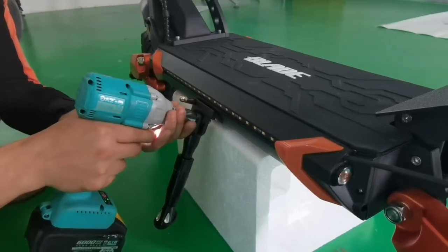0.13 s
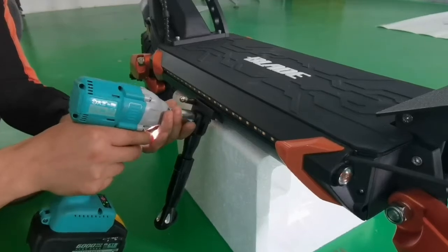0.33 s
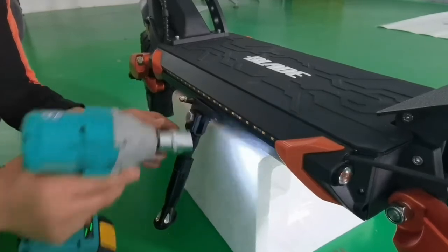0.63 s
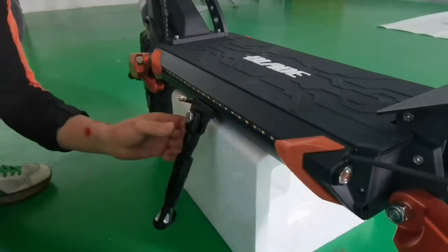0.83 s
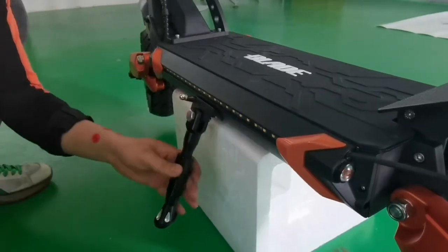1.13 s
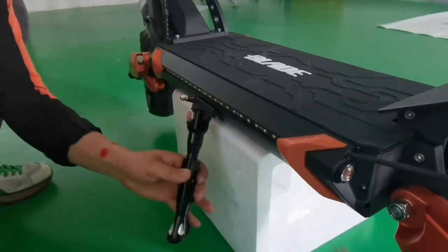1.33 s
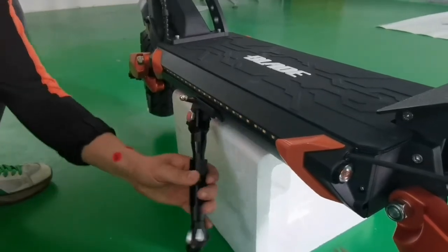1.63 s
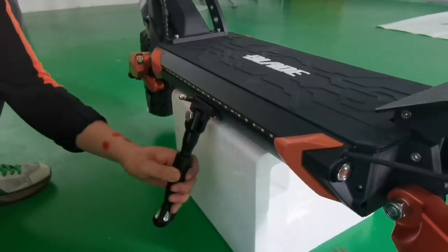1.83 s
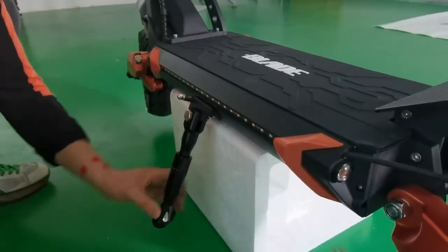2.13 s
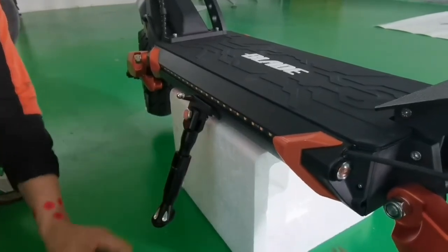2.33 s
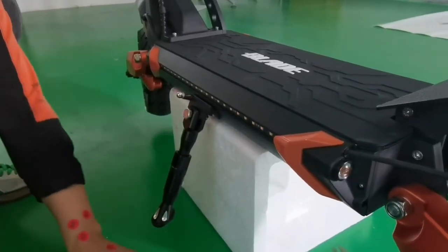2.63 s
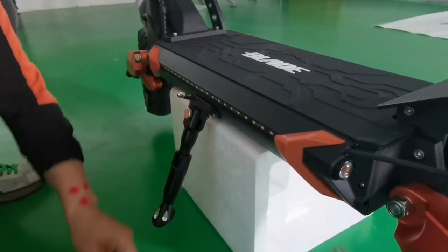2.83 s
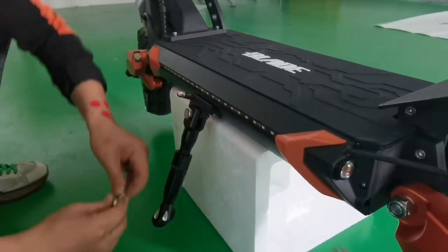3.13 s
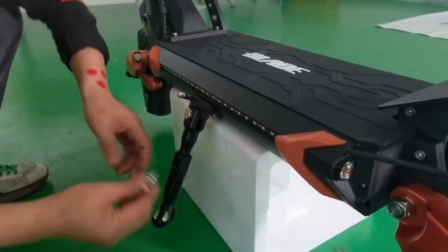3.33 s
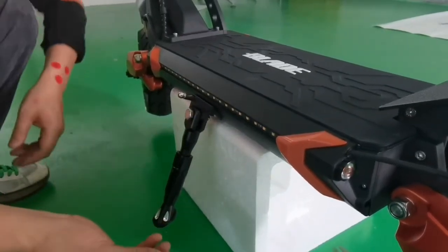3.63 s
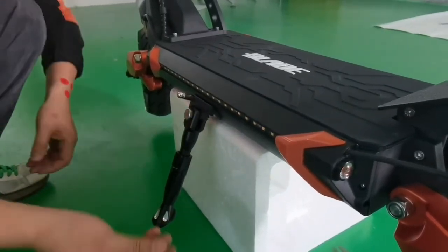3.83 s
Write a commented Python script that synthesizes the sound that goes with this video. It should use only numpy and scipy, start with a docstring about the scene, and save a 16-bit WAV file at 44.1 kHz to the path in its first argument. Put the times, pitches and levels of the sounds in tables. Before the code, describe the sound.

Impact driver close to the microphone: brief motor wind-down, short pause, harsh hammering on a bolt, echoing tail. Then quiet kickstand clicks, a sharper snap with frame shudder, sleeve rustle and a distant scrape over low workshop rumble.

```python
"""A motor blip winds down, then a cordless impact driver restarts and hammers a bolt home on a kickstand.
Seven blows grind and ring the steel socket: shaped grit drives filters and damped modes.
A hand swings the stand out with two clicks and lets it snap back: short grit bursts, then a frame shudder.
A large hard-floored workshop answers with decaying noise; under it a rumble, hum, faint drones,
a rustling sleeve and a far scrape, all from filtered noise or wavering tones."""
import sys
import numpy as np
from scipy import signal
from scipy.fft import rfft, irfft
from scipy.io import wavfile
from scipy.ndimage import uniform_filter1d

SR = 44100
rng = np.random.default_rng(int(sys.argv[2]) if len(sys.argv) > 2 else 0)


def materialize(psi):
    """Save the field psi as 16-bit PCM at rate SR to the path in sys.argv[1].

    A 1-D psi becomes a single channel; in a 2-D psi each row is a channel.
    """
    bounded = np.clip(np.atleast_2d(psi).T, -1, 1)
    quanta = np.round(bounded * 32767).astype(np.int16)
    wavfile.write(sys.argv[1], SR, quanta)


N = 176400
LEAD_S = .25  # computed ahead of time 0, dropped in scene()
T = np.arange(-int(LEAD_S * SR), N) / SR
M = len(T)


def undb(db):
    """Decibels to gain."""
    return 10 ** (np.asarray(db) / 20)


def unit(x):
    """Scale to rms 1."""
    return x / np.sqrt(np.mean(x ** 2) + 1e-30)


def curve(rows, axis=1):
    """One column of a table, joined by straight lines in time."""
    rows = np.array(rows)
    return np.interp(T, rows[:, 0], rows[:, axis])


def colour(x, points):
    """Causal minimum-phase filter of unit power through (frequency [Hz], level [dB]) points."""
    size = 8192
    hz, db = np.array(points).T
    log_f = np.log(np.fft.rfftfreq(size, 1 / SR) + 1)
    gain = unit(undb(np.interp(log_f, np.log(hz), db)))
    cepstrum = irfft(np.log(gain))
    cepstrum[1:size // 2] *= 2  # fold onto positive time
    cepstrum[size // 2 + 1:] = 0
    impulse = irfft(np.exp(rfft(cepstrum)))
    return signal.fftconvolve(x, impulse)[:len(x)]


def band(x, hz, width_hz, order=1):
    """Band-pass around a centre."""
    edges = np.clip([hz - width_hz / 2, hz + width_hz / 2], 10, SR / 2 - 100)
    return signal.sosfilt(signal.butter(order, edges, "band", fs=SR, output="sos"), x)


def noise():
    """White noise."""
    return rng.standard_normal(M)


def walk(rate_hz):
    """Smoothed random steps of rms 1."""
    hold = int(SR / rate_hz)
    steps = np.repeat(rng.standard_normal(M // hold + 1), hold)
    return unit(uniform_filter1d(steps, hold)[:M])


def grit(grain_db):
    """Dense tiny contacts of uneven size."""
    return unit(np.tanh(noise()) * undb(grain_db * np.tanh(walk(1500))))


def contact(at, rise, fall):
    """Force of a contact: exponential build-up and decay."""
    return np.exp(-np.minimum(np.where(T < at, (at - T) / rise, (T - at) / fall), 60))


def bump(at, rise, fall):
    """Force of a firm contact: Gaussian flanks."""
    return np.exp(-np.minimum(((T - at) / np.where(T < at, rise, fall)) ** 2, 60))


def ping(at, rise, fall, hz):
    """A few cycles of a well-damped resonance."""
    return bump(at, rise, fall) * np.sin(2 * np.pi * hz * (T - at))


def ring(x, modes):
    """Damped modes driven by x; their joint impulse response has unit power."""
    t = np.arange(SR // 2) / SR
    impulse = 0
    for hz, db, t60 in modes:
        decay = np.exp(-np.log(1000) * t / t60)
        impulse = impulse + undb(db) / np.sqrt(t60) * np.sin(2 * np.pi * hz * t) * decay
    return signal.fftconvolve(x, impulse / np.linalg.norm(impulse))[:M]


def resonances(rows):
    """Noise held in a few resonances."""
    return sum(undb(db) * unit(band(noise(), hz, width, order=2)) for hz, width, db in rows)


# hall air: (frequency [Hz], level [dB])
HALL_COLOUR = [(15, -48), (28, -27), (50, -11), (80, -5), (110, -6.5), (150, 0), (200, -6.5), (420, -8),
               (600, -14), (730, -12.5), (1500, -20), (2800, -25.5), (4100, -20.5), (5200, -30.5),
               (7400, -33.5), (8800, -54), (11600, -45.5), (14000, -53)]
# hall air: (time [s], level [dB])
HALL_LEVEL = [(0, -63.5), (2.4, -65), (3.1, -67), (3.27, -64), (3.6, -66.5), (4, -66)]


def hall_air():
    """Broadband hall rumble: coloured noise, slightly unsteady."""
    return undb(curve(HALL_LEVEL) + 0.51 * walk(16)) * colour(noise(), HALL_COLOUR)


# bass: (time [s], level [dB])
BASS_LEVEL = [(0, -80), (0.8, -82.5), (0.9, -73), (1.05, -80.5), (3.1, -71), (3.25, -62), (3.45, -66),
              (3.58, -73.5), (3.8, -66), (4, -66)]


def bass_rumble():
    """Bass noise around 72 Hz that swells and sinks."""
    return undb(curve(BASS_LEVEL)) * unit(band(noise(), 72, 62, order=2))


# machinery: (frequency [Hz], level [dB])
HUM_BANDS = [(55, -78.5), (150, -70.5), (424, -83)]


def machine_hum():
    """Machinery hum: noise in 12 Hz wide bands."""
    return sum(undb(db) * unit(band(noise(), hz, 12, order=2)) for hz, db in HUM_BANDS)


OCTAVE_DB = -17


def swell(at, length, hz, db, waver):
    """A wavering tone with a faint octave; it rises and fades."""
    progress = np.clip((T - at) / length, 0, 1)
    shape = np.sqrt(np.maximum(np.sin(np.pi * progress), 0))
    phase = 2 * np.pi * np.cumsum(hz * (1 + waver * walk(160))) / SR
    tone = unit(np.sin(phase) + undb(OCTAVE_DB) * np.sin(2 * phase))
    return undb(db) * shape * tone * undb(2 * walk(60))


# low drone swells: (time [s], length [s], frequency [Hz], level [dB])
DRONE_SWELLS = [(0.808, 0.065, 160, -56), (0.983, 0.044, 174, -58), (1.039, 0.085, 175, -55.5),
                (1.124, 0.063, 170, -56), (1.303, 0.048, 152, -53.5), (1.355, 0.13, 154, -59.5)]
# one thin tone: (time [s], length [s], frequency [Hz], level [dB])
THIN_TONE = (0.93, 0.6, 750, -66.5)
DRONE_WAVER, THIN_WAVER = .045, .02  # rms, fraction of pitch


def drones():
    """Short low swells and one longer thin tone, all with random pitch waver."""
    low = sum(swell(*row, waver=DRONE_WAVER) for row in DRONE_SWELLS)
    return low + swell(*THIN_TONE, waver=THIN_WAVER)


# sleeve: (time [s], level [dB])
RUSTLE_LEVEL = [(1.2, -95.5), (1.42, -67.5), (1.6, -86), (2.8, -89), (2.95, -73.5), (3.2, -77), (3.35, -75),
                (3.65, -94), (3.85, -77.5), (4.0, -72)]
# sleeve: (frequency [Hz], level [dB])
RUSTLE_COLOUR = [(300, 3), (1500, -2), (4000, 1.5), (7000, -2.5), (9000, -13.5), (14000, -11)]


def sleeve():
    """Cloth rustle: coloured grit under a fluttering level."""
    return undb(curve(RUSTLE_LEVEL) + 1.6 * walk(26)) * colour(grit(grain_db=2.5), RUSTLE_COLOUR)


# far scrape: (time [s], level [dB])
SCRAPE_LEVEL = [(3.66, -88.5), (3.76, -62.5), (3.88, -61), (4.0, -59.5)]
# far scrape: (frequency [Hz], width [Hz], level [dB])
SCRAPE_BANDS = [(655, 39, -2), (700, 160, -7.5), (1180, 250, -19), (1830, 390, -16.5)]


def far_scrape():
    """Something scrapes far off: noise in a few resonances."""
    return undb(curve(SCRAPE_LEVEL)) * resonances(SCRAPE_BANDS)


def workshop():
    """Sum of the background layers."""
    return hall_air() + bass_rumble() + machine_hum() + drones() + sleeve() + far_scrape()


# reverberation: (frequency [Hz], level [dB], t60 [s])
ROOM_BANDS = [(100, -18, 1.0), (445.8, -4.5, 1.5), (950, -11, 1.9), (2171, -7.8, 1.6), (3900, -10.3, 1.2),
              (6800, -6.5, .95), (11930, -8, 0.52)]
EARLY_DB, EARLY_T60_S, FIRST_ECHO_S = -8.5, .25, .008
ECHO_GRAIN_DB = 2.5  # unevenness of the tail


def room(x):
    """Quick echoes off floor and deck, then the hall's long tail, whose treble dies first."""
    size = 2 * SR
    t = np.arange(size) / SR
    log_f = np.log(np.fft.rfftfreq(size, 1 / SR) + 1)

    def decay(t60):
        """Exponential decay of unit energy."""
        return np.exp(-np.log(1000) * t / t60) * np.sqrt(2 * np.log(1000) / (t60 * SR))

    wash = rfft(unit(rng.standard_normal(size) * undb(ECHO_GRAIN_DB * walk(250)[:size])))
    centres = np.log([row[0] for row in ROOM_BANDS])
    impulse = undb(EARLY_DB) * decay(EARLY_T60_S) * rng.standard_normal(size)
    for (_, db, t60), share in zip(ROOM_BANDS, np.eye(len(ROOM_BANDS))):
        band_wash = irfft(wash * np.interp(log_f, centres, share))  # triangular crossfades
        impulse = impulse + undb(db) * decay(t60) * band_wash
    return x + signal.fftconvolve(x, impulse * (t > FIRST_ECHO_S))[:M]


# housing groans: (time [s], fall [s], frequency [Hz], level [dB])
GROAN_EVENTS = [(.381, .012, 610, -33), (.397, .01, 480, -35), (.446, .035, 460, -43)]


def housing_groans():
    """The braking motor groans through the housing: short bursts of narrow-band noise."""
    out = 0
    for at, fall, hz, db in GROAN_EVENTS:
        out = out + undb(db) * bump(at, .006, fall) * unit(band(noise(), hz, 140, order=2))
    return out


# frame: (frequency [Hz], width [Hz], level [dB])
FRAME_BANDS = [(467, 200, -5.5), (800, 250, -2.5), (1220, 170, -3.5)]
SHUDDER_S, SHUDDER_DB, SHUDDER_RISE_S, SHUDDER_FALL_S = 1.858, -55.5, .0093, .12


def frame_shudder():
    """The frame shakes after the stand snaps back: resonant noise with a decaying, uneven level."""
    force = contact(SHUDDER_S, SHUDDER_RISE_S, SHUDDER_FALL_S)
    return undb(SHUDDER_DB) * force * resonances(FRAME_BANDS) * undb(2 * walk(90))


# stand clicks: (time [s], level [dB], rise [s], fall [s], knock [dB], ring [dB], tick [dB])
STAND_CLICKS = [(1.2971, -52.5, 0.0025, 0.0038, 3, -5, -2.5), (1.3626, -51, 0.0015, 0.0028, 2, -20, -6.5),
                (1.8415, -43, 0.0006, .0048, -11, 8.5, -27), (1.869, -50, 0.0061, 0.0086, 0, -3, -11.5)]
# stand modes: (frequency [Hz], level [dB], t60 [s])
STAND_MODES = [(640, -3, .06), (780, -3, .05), (900, -10, .04), (1260, -12, .02), (2300, -9, .012),
               (3450, -2, .008), (4000, -1, .008), (4300, 0, .008), (4850, -1, .004)]
# frame knock: (frequency [Hz], level [dB])
KNOCK_COLOUR = [(100, -24), (350, -5), (750, -5), (1500, -3.5), (2800, -6), (4200, -9.5), (8000, -14.5),
                (14000, -40)]
# bright tick: (frequency [Hz], level [dB])
TICK_COLOUR = [(500, -12), (2000, -2), (4000, 1.5), (7000, -9), (12000, 4), (15000, -29)]
STEEL_TOP_HZ = 5800


def stand():
    """The leg meets its stops: a dull knock in the frame, a steel ring and a bright tick."""
    low_pass = signal.butter(6, STEEL_TOP_HZ, fs=SR, output="sos")
    out = 0
    for at, db, rise, fall, knock_db, ring_db, tick_db in STAND_CLICKS:
        force = undb(db) * bump(at, rise, fall)
        knock, steel, tick = (force * grit(grain_db=4) for _ in range(3))
        steel = signal.sosfilt(low_pass, steel)
        out = out + undb(knock_db) * colour(knock, KNOCK_COLOUR)
        out = out + undb(ring_db) * ring(steel, STAND_MODES)
        out = out + undb(tick_db) * colour(tick, TICK_COLOUR)
    return out


# motor effort: (time [s], level [dB])
MOTOR_EFFORT = [(-0.12, 0.5), (-0.02, 2.5), (0.008, -8), (0.04, -21), (0.15, -21), (0.188, -32),
                (0.203, -1.5), (0.25, -6.5), (0.3, -0.5), (0.385, -3.5), (0.41, -4.5), (0.48, -11.5),
                (0.56, -49)]
# gear mesh: (time [s], pitch [Hz], whine level [dB])
GEAR_WHINE = [(0, 1150, -47), (0.028, 1090, -35), (0.042, 1070, -50.5), (0.06, 1050, -60), (0.17, 800, -72),
              (0.21, 950, -56), (0.36, 900, -55), (0.39, 520, -49), (0.47, 420, -74.5), (0.56, 300, -94)]
# gear rattle: (frequency [Hz], level [dB])
GEAR_COLOUR = [(88, -58), (150, -31), (426, -8), (600, -3.5), (860, -4.5), (1080, -1), (1550, -6),
               (4230, -2), (7070, -11.5), (11600, -13), (14000, -18.5)]
GEAR_DB, GEAR_GRAIN_DB, OVERTONE_DB = -30, 0.5, -11.5


def motor():
    """Gears rattle with the effort and whine at a pitch that falls as the motor brakes."""
    rattle = undb(GEAR_DB + curve(MOTOR_EFFORT)) * colour(grit(GEAR_GRAIN_DB), GEAR_COLOUR)
    phase = 2 * np.pi * np.cumsum(curve(GEAR_WHINE) * (1 + .025 * walk(300))) / SR
    whine = unit(np.sin(phase) + undb(OVERTONE_DB) * np.sin(4 * phase))
    running = T < MOTOR_EFFORT[-1][0]
    return (rattle + undb(curve(GEAR_WHINE, axis=2)) * whine) * running


# blows: (time [s], level [dB], steel ring [dB], treble [dB], body knock [Hz], knock [dB],
#         deck thump [Hz], thump [dB])
HAMMER_BLOWS = [(0.2050, -5.5, -4, -2, 870, -33, 200, -60), (0.2397, -2.5, 0, 1.5, 820, -40, 100, -50),
                (0.2685, .5, -4, 3, 920, -29, 45, -40), (0.2928, 1.5, -2, 1, 900, -24, 240, -41),
                (0.3168, -.5, 0, -1, 1040, -30, 150, -34.5), (0.3418, 0, -2, 0, 1350, -36, 85, -38.5),
                (0.3668, 0, 3, -4, 920, -29, 250, -54)]
# grinding: (frequency [Hz], level [dB])
BLOW_COLOUR = [(120, -46.5), (200, -21.5), (340, -13.5), (420, -23.5), (571, -15), (890, -2.5), (1270, -7),
               (1400, -12.5), (1900, -13.5), (2240, 0), (2500, -8), (4330, 1.5), (7250, -3.5), (11700, -3),
               (14000, -4)]
# socket, anvil and bolt modes: (frequency [Hz], level [dB], t60 [s])
SOCKET_MODES = [(587, -6, .2), (830, -6, .04), (915, -7, .05), (2290, -3, .03), (3030, -8, .15),
                (3275, -3, .08), (4210, -1, .05), (4290, -2, .05), (4457, -1, .08), (5190, -6, .04),
                (6820, -6, .03), (11600, -4, .008)]
BLOW_RISE_S, BLOW_FALL_S, BLOW_DB, SOCKET_DB = 0.0043, 0.0031, -15, -25.5
SKIRT_DB, SKIRT_S = -5, 0.0034  # looser grinding before and after a blow
KNOCK_RISE_S, KNOCK_FALL_S, THUMP_FALL_S = .003, .006, .008
TREBLE_HZ = 7500  # high-pass corner
CHATTER_DB, CHATTER_HZ, CHATTER_WIDTH_HZ = -34, 11550, 4000


def hammer():
    """Blows grind the socket on the bolt, ring steel, knock the frame, thump the deck; the socket chatters."""
    rough = grit(grain_db=2.5)
    high_pass = signal.butter(2, TREBLE_HZ, "high", fs=SR, output="sos")
    treble = signal.sosfiltfilt(high_pass, rough)
    grind = strike = body = 0
    for at, db, ring_db, treble_db, knock_hz, knock_db, thump_hz, thump_db in HAMMER_BLOWS:
        skirt = undb(SKIRT_DB) * contact(at, SKIRT_S, SKIRT_S)
        force = undb(db) * np.maximum(bump(at, BLOW_RISE_S, BLOW_FALL_S), skirt)
        grind = grind + force * (rough + (undb(treble_db) - 1) * treble)
        strike = strike + undb(ring_db) * force * rough
        body = body + undb(knock_db) * ping(at, KNOCK_RISE_S, KNOCK_FALL_S, knock_hz)
        body = body + undb(thump_db) * ping(at, KNOCK_RISE_S, THUMP_FALL_S, thump_hz)
    working = 1. * ((T > HAMMER_BLOWS[0][0]) & (T < HAMMER_BLOWS[-1][0]))
    working = uniform_filter1d(working, size=200)
    chatter = working * unit(band(grit(grain_db=4), CHATTER_HZ, CHATTER_WIDTH_HZ))
    grind = undb(BLOW_DB) * colour(grind, BLOW_COLOUR)
    steel = undb(SOCKET_DB) * ring(strike, SOCKET_MODES)
    return grind + steel + body + undb(CHATTER_DB) * chatter


HOLLOW_HZ, HOLLOW_WIDTH_HZ, HOLLOW_DB = 2690, 340, -11


def scene():
    """Driver and stand in the hall, over its background; the metal is hollow between its resonances."""
    metal = room(hammer() + motor() + stand() + housing_groans() + frame_shudder())
    metal = metal - (1 - undb(HOLLOW_DB)) * band(metal, HOLLOW_HZ, HOLLOW_WIDTH_HZ)
    return (metal + workshop())[None, -N:]


CEILING = .45  # saturation peak, full scale = 1
TOP_HZ = 14100


def record(dry):
    """The microphone rounds the loudest peaks; the recorder cuts the top."""
    rounded = CEILING * np.tanh(dry / CEILING)
    return signal.sosfilt(signal.ellip(10, .2, 80, TOP_HZ, fs=SR, output="sos"), rounded)


dry = scene()
out = record(dry)
materialize(out)
```